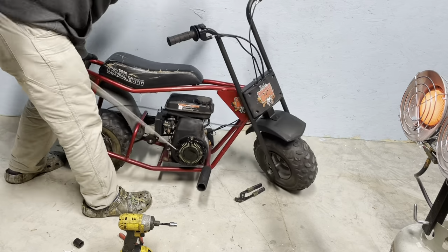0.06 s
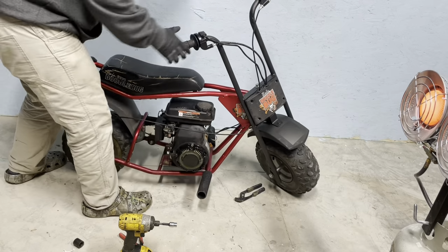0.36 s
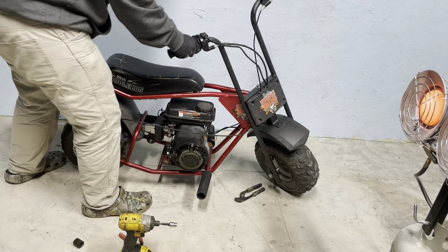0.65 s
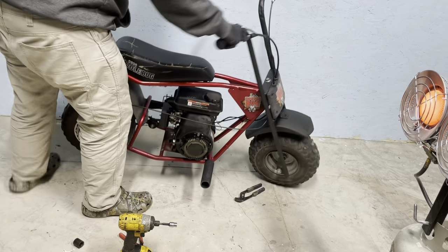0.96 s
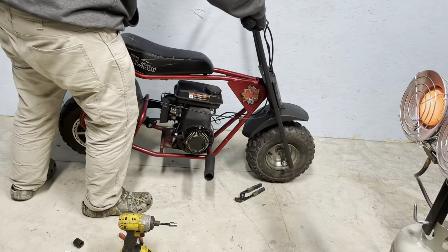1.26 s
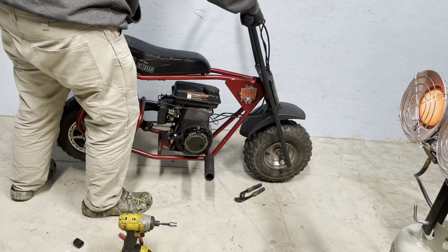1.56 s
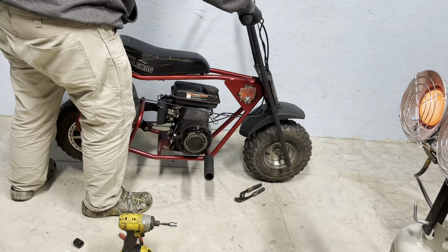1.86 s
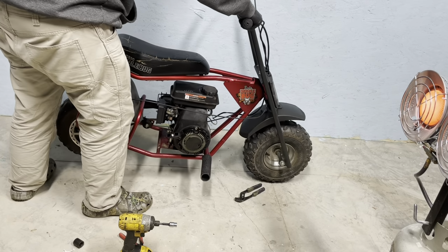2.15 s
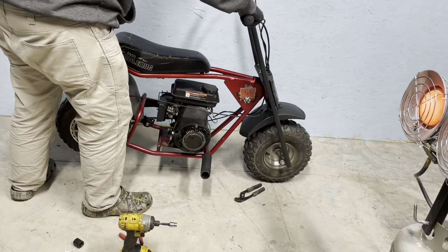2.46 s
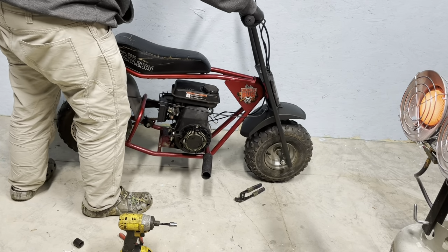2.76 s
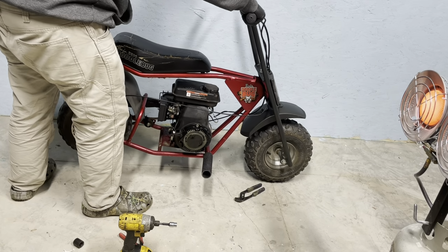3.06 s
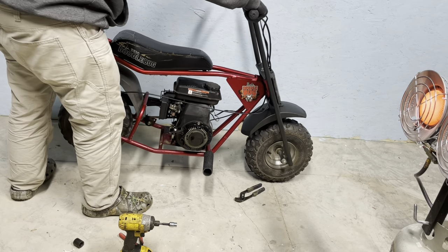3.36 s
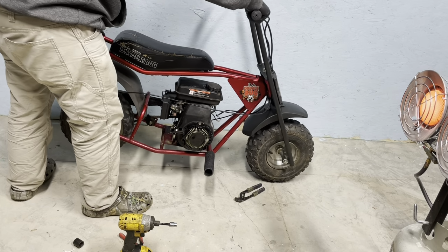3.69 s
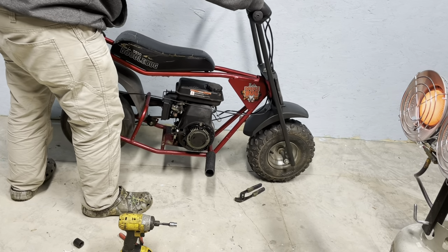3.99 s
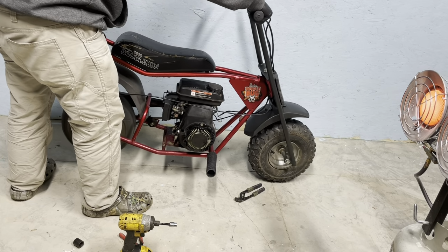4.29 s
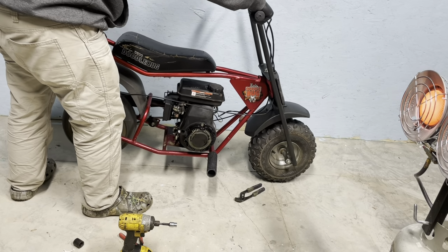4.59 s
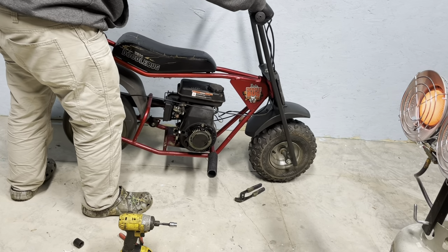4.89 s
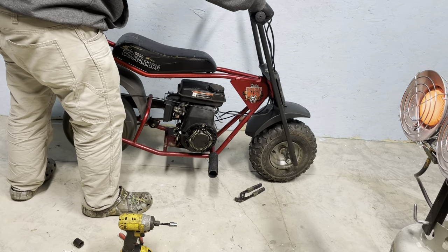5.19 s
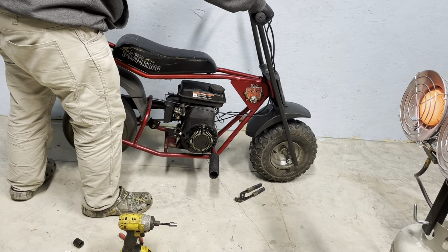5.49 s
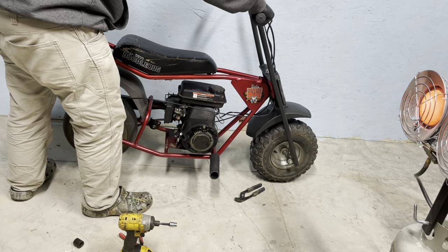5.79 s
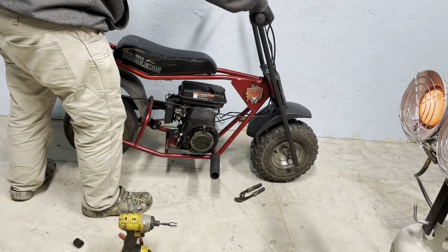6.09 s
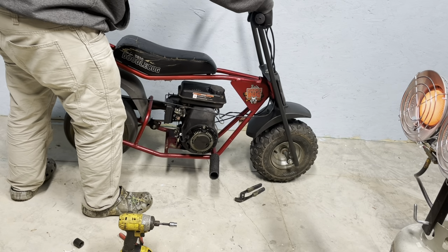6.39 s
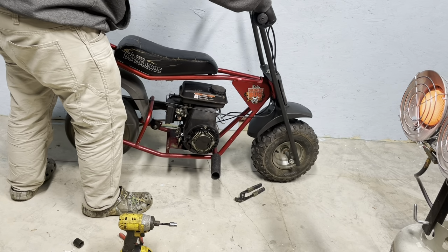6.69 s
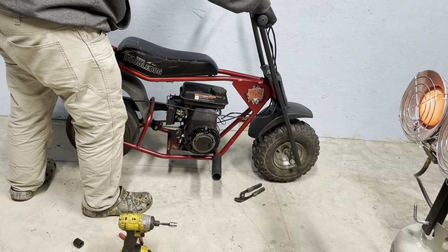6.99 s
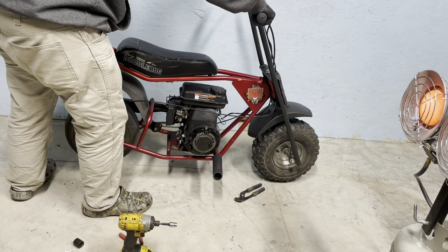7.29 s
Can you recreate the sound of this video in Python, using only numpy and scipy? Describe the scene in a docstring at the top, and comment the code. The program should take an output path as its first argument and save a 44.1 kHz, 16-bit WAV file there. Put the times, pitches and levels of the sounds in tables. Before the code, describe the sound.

Heard close up in stereo in a bare garage, a small minibike engine has just been pull-started, its handle bouncing back with a tinny clack. The engine chugs with low, even thumps, then stumbles and pops as it gathers speed. A gentle rev brings a higher, hissing, rattling run with light metal knocks, before the engine slows with muffled thuds and fires again.

```python
"""A bare-walled garage, a stereo microphone pair close to a minibike that has just been pull-started.
The handle clacks home on the tin shroud. The single-cylinder four-stroke idles, fires only every other
cycle for a while, is revved gently, coasts down with dull thuds and catches again. Exhaust thumps echo
off the walls, burnt gas hisses from the outlet, and four piston reversals a cycle rattle the casing."""
import sys
import numpy as np
from scipy import signal
from scipy.fft import rfft, irfft, next_fast_len
from scipy.io import wavfile
from scipy.ndimage import uniform_filter1d

SR = 44100
rng = np.random.default_rng(int(sys.argv[2]) if len(sys.argv) > 2 else 0)


def dump(signal):
    """Clip the signal to [-1, 1] and save it as 16-bit WAV at the path in sys.argv[1]."""
    limited = np.clip(np.atleast_2d(signal).T, -1, 1)
    pcm = np.round(limited * 32767).astype(np.int16)
    wavfile.write(sys.argv[1], SR, pcm)


N = 332921
T = np.arange(N) / SR
FFT_SIZE = next_fast_len(N + SR)
HZ = np.maximum(np.arange(FFT_SIZE // 2 + 1) * SR / FFT_SIZE, 1)

# Levels are relative within each table. One engine cycle is two crank turns.
# engine speed: t/s, speed/(cycles/s)
ENGINE_SPEED = [(0.0, 12.383), (0.31, 11.84), (0.95, 12.971), (1.81, 13.665), (2.01, 14.738),
                (2.53, 14.959), (3.0, 16.009), (3.45, 17.385), (3.55, 19.11), (4.15, 19.707), (4.3, 22.094),
                (4.79, 24.056), (5.41, 28.652), (6.1, 31.342), (6.68, 25.365), (6.92, 23.85), (7.02, 22.55),
                (7.09, 21.95), (7.2, 22.05), (7.32, 21.5), (7.55, 23.055)]
# how hard the engine works: t/s, level/dB
ENGINE_EFFORT = [(0, 8), (.1, -9), (.26, -18.5), (.52, -0.5), (1.1, 1.5), (1.85, 0), (2.4, 0.7), (2.6, 0),
                 (3.45, -0.5), (3.58, -1), (4.35, 1.5), (5.3, -2), (6.1, -5.5), (6.25, -7), (6.42, -10.5),
                 (7.32, -7.5), (7.43, -3), (7.52, 1.5)]
# strength of the strokes: t/s, exhaust level/dB, intake level/dB
STROKE_LEVELS = [(0, -12, -37), (.1, -22, -38), (.24, -36, -50), (.5, -18, -33), (1.1, -15.5, -31),
                 (1.85, -17.5, -23), (2.05, -13, -25), (2.45, -15, -23), (2.6, -19.5, -22),
                 (3.45, -19, -26), (3.62, -15, -41), (3.85, -19, -42), (4.2, -15.5, -38), (4.4, -13, -27),
                 (4.6, -21, -27), (4.75, -14.5, -25), (5.1, -12.5, -31), (5.5, -18, -26.5),
                 (6.0, -19.5, -28), (6.25, -27, -29), (7.3, -23, -44), (7.42, -18, -29)]
# cycles that fail to fire: t/s
MISFIRES = [2.55, 2.68, 2.81, 2.94, 3.06, 3.18, 3.3, 3.42]
# sharp pops, mostly after a missed cycle: t/s, level/dB
EXHAUST_POPS = [(2.412, -35), (2.6147, -27.5), (2.744, -25.5), (2.872, -26.5), (2.997, -25.5),
                (3.119, -26.5), (3.2414, -24.5), (3.359, -23.5), (3.4754, -21.5), (3.528, -17.5),
                (3.5834, -22), (3.6342, -15.5), (3.735, -14.5), (3.842, -14.5), (3.9435, -13), (3.998, -30),
                (4.0477, -12.5), (4.097, -15), (6.054, -31), (6.085, -24)]
# dull thuds in the muffler while coasting: t/s, level/dB
COASTING_THUDS = [(6.0993, -20), (6.166, -33), (6.224, -23), (6.377, -18), (6.42, -23), (6.51, -20),
                  (6.545, -20), (6.639, -20), (6.731, -19)]
# muffler resonances: f/Hz, width/Hz, level/dB
MUFFLER_MODES = [(99, 46, 6.5), (156, 60, -17.5)]
# air box resonances: f/Hz, width/Hz, level/dB
AIRBOX_MODES = [(99, 63, -3), (132, 50, 4), (200, 70, 2.5)]
# the direct thump and its wall echoes, which make the double chug: delay/s, level/dB
WALL_ECHOES = [(0, 0), (.014, .8), (.0197, -7), (.0439, -6.5)]
# deep bass booming in the garage: t/s, level/dB
BOOM_LEVEL = [(0.0, -22), (0.17, -49), (0.21, -71), (0.44, -43), (1.16, -33), (2.12, -39), (2.61, -35),
              (4.0, -37), (4.86, -21), (4.98, -25), (5.95, -35), (6.29, -56), (6.73, -39), (7.04, -63),
              (7.55, -29)]
# stretches in which every cycle fires with a hiss: start/s, end/s, level/dB
FIRING_SPANS = [(.38, 1.4, -53.5), (1.4, 1.93, -54), (1.93, 2.46, -45.5), (4.13, 6.1, -31),
                (7.36, 7.59, -31)]
# spectrum of the gas jet: f/Hz, level/dB
PUFF_SPECTRUM = [(400, 12), (1000, 7.5), (3000, 6.5), (5000, 0), (7300, 7.5), (8600, 12.5), (10500, 9),
                 (13500, 10), (16000, 0)]
# whistles of the muffler outlet: f/Hz, width/Hz, lift/dB
OUTLET_WHISTLES = [(3090, 130, 5), (5360, 180, 7), (6500, 180, 4), (7000, 230, 7), (10700, 200, 3),
                   (12500, 300, 4), (13650, 500, 3)]
# spectrum of the casing's low drone: f/Hz, level/dB
DRONE_SPECTRUM = [(120, 0), (220, -1.5), (320, -2.5), (440, -0.5), (540, -4), (700, -8.5), (1400, -29.5)]
# spectrum of the intake's bark: f/Hz, level/dB
BARK_SPECTRUM = [(350, -40), (500, -1), (600, 6.5), (690, 6.5), (780, -1), (900, -4.5), (1500, -31)]
# spectrum of rattling metal: f/Hz, level/dB
RATTLE_SPECTRUM = [(400, -10), (800, -3), (1100, -1), (1800, 5), (3000, 1.5), (4800, -4), (5700, -4),
                   (7500, -8), (10000, -25), (16000, -45)]
# spectrum of the clutch's hiss: f/Hz, level/dB
CLUTCH_SPECTRUM = [(1500, -14), (3000, 3), (4500, 8), (5700, -1), (7300, 0), (8500, 9), (10000, 1.5),
                   (12000, -2), (13700, 3), (16000, -7)]
# casing resonances: f/Hz, width/Hz, lift/dB
CASING_MODES = [(425, 50, 5.5), (568, 63, 2.5), (611, 50, 1), (668, 55, 3), (996, 160, 7), (1212, 180, 5.5),
                (1620, 110, 4.5), (2220, 70, 1.5), (2740, 150, 3.5), (3100, 120, 2.5), (4110, 67, 1),
                (4800, 150, 2.5)]
# starter handle hitting the shroud: t/s, crack level/dB, ring level/dB
HANDLE_HITS = [(0.0302, -6.5, -12), (0.039, -10, -15), (.092, -11, -24), (0.1034, -5, 4.5),
               (0.114, -8.5, -21), (0.139, -4.5, 1), (0.147, -5.5, 3.5), (0.16, -7, 1), (0.169, -10, -9)]
# spectrum of the handle's crack: f/Hz, level/dB
CRACK_SPECTRUM = [(350, -8.5), (600, 2), (800, -18), (1000, 6), (1250, -4.5), (1700, 5), (2900, -1),
                  (3900, 1), (6000, -3.5), (8500, 5.5), (11000, 1), (16000, -6.5)]
# modes of the tin shroud: f/Hz, level/dB, t60/s
SHROUD_MODES = [(1030, 6, .16), (1850, -4, .35), (2040, 0, .2), (2375, 8, .08), (2660, 9, .08),
                (2950, 11, .1), (3375, 1, .2), (3760, -2, .3), (6800, -5, .25), (8070, -3, .16),
                (8700, 0, .15), (10100, -2, .2), (10800, -5, .15), (12900, -4, .15)]
# loose metal knocking during the rev: t/s, level/dB
METAL_KNOCKS = [(4.56, -20), (4.6435, -21.5), (4.745, -21), (4.8135, -27), (4.9745, -32), (5.0112, -24),
                (5.1674, -26), (5.2084, -23), (5.239, -24.5), (5.3091, -27), (5.5247, -20.5)]
# cooling fins and heat shield: f/Hz, width/Hz, level/dB, jolt angle/cycles
FIN_MODES = [(983, 84, -38.5, 0.615), (1010, 65, -38, 0.85), (1615, 100, -49.5, 0.032),
             (3140, 380, -43, 0.018), (1704, 60, -49, 0.3), (3150, 200, -46, 0.53), (5210, 90, -44, 0.015),
             (5260, 72, -53, 0.24), (5340, 110, -53, 0.58), (6470, 180, -44, 0.015),
             (6750, 120, -49.5, 0.42), (7180, 100, -44.5, 0.016), (7170, 130, -47, 0.36),
             (7870, 440, -42.5, 0.0096)]
# casing hoot, slipping clutch's sizzle, a growl and two tinny rings, each near one engine speed:
# speed/(cycles/s), reach/(cycles/s), f/Hz, width/Hz, level/dB
SINGING_PARTS = [(22.7, 1.0, 415, 40, -37), (19.58, .22, 13400, 1800, -28.5), (29.5, 2.2, 640, 150, -35),
                 (24, 3, 2750, 150, -43.5), (24, 3, 4600, 250, -43.5)]
# casing resonances that the gear whine meets: f/Hz, width/Hz, level/dB
HOOT_MODES = [(404, 7, -31), (430, 8, -38)]
# the microphone pair: f/Hz, left-right likeness, left lead/rad, left over right/dB
MIC_PAIR = [(60, .99, 0, 1), (160, .96, 0, 1.5), (330, .75, .1, .7), (680, .3, .3, .8), (1000, .5, .3, 2),
            (1450, .48, 0, 2), (3100, .62, 1.3, 2), (5200, .42, 1.1, 2.4), (5800, .42, -1.7, 2),
            (6800, .48, -1.4, 1), (7600, .85, -2.7, 0), (8600, .96, -3.15, 0), (11000, .78, -4.7, 0),
            (13200, .98, -6.28, 0), (16000, .98, -6.28, 0)]

IDLE_SPEED, MID_SPEED, BARK_OPENS_SPEED, CLUTCH_BITE_SPEED = 12.8, 20, 20.7, 18.24  # cycles/s
THUMP_LAG_S, SUCK_LAG_S = .0084, .006
DRONE_BAND, BARK_BAND, RATTLE_BAND, HISS_BAND = (330, 520), (540, 760), (1200, 5000), (9500, 16000)  # Hz
GARAGE_T60_S, LOW_CUT_HZ, HIGH_CUT_HZ = 0.38, 52, 16000


def putter(cycles, pop_lift_db=4, suck_db=2):
    """A fired cycle pushes gas through the muffler, a missed one sucks it back; the air box gulps."""
    exhaust_db, intake_db = in_time(STROKE_LEVELS)
    exhaust_db += pop_lift_db * near(np.transpose(EXHAUST_POPS)[0])
    strokes = from_db(exhaust_db) * each_cycle(cycles, 0, jitter_s=.0001, spread_db=0.6)
    missed = near(MISFIRES)
    pushes = later(strokes * (1 - missed), THUMP_LAG_S)
    sucks = from_db(suck_db) * later(strokes * missed, SUCK_LAG_S)
    thuds = later(listed_clicks(COASTING_THUDS), THUMP_LAG_S)
    gas = swell(pushes - sucks + thuds, peak_s=0.0019, order=3)
    gulps = from_db(intake_db) * each_cycle(cycles, .21, jitter_s=.0001, spread_db=2.2)
    air = -swell(later(gulps, THUMP_LAG_S), peak_s=0.0041, order=3)
    muffler = sum(from_db(db) * resonate(gas, hz, width) for hz, width, db in MUFFLER_MODES)
    airbox = sum(from_db(db) * resonate(air, hz, width) for hz, width, db in AIRBOX_MODES)
    return muffler + airbox


def exhaust_puffs(cycles, speed, effort_db):
    """Burnt gas jets through the outlet for a few ms, in steady firing and at each pop."""
    firing = sum(from_db(db + 8 + 0.51 * effort_db) * (T > start) * (T < end)
                 for start, end, db in FIRING_SPANS)
    firing *= (IDLE_SPEED / speed) ** 0.67  # crowded puffs each carry less of the level
    regular = firing * each_cycle(cycles + .0078 * speed, .06, jitter_s=0.00018, spread_db=2.2)
    pops = from_db(-6) * listed_clicks(EXHAUST_POPS)
    jet = swell(regular, peak_s=0.0083, order=4) + swell(pops, peak_s=0.0034)
    # squared, so only hard pops shake the heat shield into a sizzle
    sizzle = from_db(9) * swell(pops ** 2, peak_s=0.017, order=1)
    return colour(np.hypot(jet, sizzle) * noise(), PUFF_SPECTRUM, OUTLET_WHISTLES, HISS_BAND)


def clatter(cycles, speed, effort_db):
    """The piston slaps, the valves tick shut, the intake barks; the starter rope whirrs onto its reel."""
    slaps = sum(each_cycle(cycles, reversal / 4 + 0.1022, jitter_s=0.00046, spread_db=3.2)
                for reversal in range(4))
    ticks = sum(each_cycle(cycles, angle, jitter_s=.0003, spread_db=2.5) for angle in (.3, .51))
    chuffs = each_cycle(cycles, .13, jitter_s=.0005, spread_db=1.5)
    # each envelope is a steady floor with bumps on it
    drone = evened(from_db(4) + swell(slaps, peak_s=0.00024) + from_db(-16) * swell(chuffs, peak_s=.008))
    drone *= engine_gain(speed, -35 + 0.6 * effort_db, per_doubling_db=7.6)
    bark = evened(from_db(5) + swell(slaps, peak_s=.0015) + from_db(-2) * swell(ticks, peak_s=0.0028))
    bark *= engine_gain(speed, -39 + 0.89 * effort_db, per_doubling_db=9.9)
    bark *= from_db(8 * past(speed, BARK_OPENS_SPEED, width=1.3))
    rattle = evened(from_db(6) + swell(slaps, peak_s=0.00057) + from_db(16) * swell(ticks, peak_s=93e-6))
    rattle *= engine_gain(speed, -30.5 + effort_db, per_doubling_db=16.45)
    rope = from_db(-32.5 - 71 * np.maximum(T - 0.49, 0))  # home at 0.49 s, then fading 71 dB/s
    return (colour(drone * noise(), DRONE_SPECTRUM, CASING_MODES, DRONE_BAND)
            + colour(bark * noise(), BARK_SPECTRUM, CASING_MODES, BARK_BAND)
            + colour(np.hypot(rattle, rope) * noise(), RATTLE_SPECTRUM, CASING_MODES, RATTLE_BAND))


def starter_handle():
    """The handle bounces on the tin shroud: a crunchy crack each time, and the shroud rings on."""
    times, crack_db, ring_db = np.transpose(HANDLE_HITS)
    bursts = swell(clicks(times, from_db(crack_db)), peak_s=0.0029, order=1) * noise()
    cracks = colour(bursts, CRACK_SPECTRUM, [(2870, 630, 5.1)], HISS_BAND)
    t = T[:SR]
    shroud = sum(from_db(db - 60 * t / t60) * np.sin(2 * np.pi * (hz * t + rng.random((2, 1))))
                 for hz, db, t60 in SHROUD_MODES)
    ringing = signal.fftconvolve(clicks(times, from_db(ring_db))[None], shroud, axes=1)[:, :N]
    return from_db(-14) * cracks + from_db(-36.5) * ringing


def clutch(speed, effort_db):
    """The clutch hisses once it bites; at lower speeds it runs free, almost silent."""
    free = 1 - past(speed, CLUTCH_BITE_SPEED, width=0.77)
    gain = engine_gain(speed, -32 + 0.84 * effort_db - 50 * free, per_doubling_db=6.9)
    return colour(gain * noise(), CLUTCH_SPECTRUM, [], HISS_BAND)


def loose_metal():
    """Loose metal strikes the casing, a short crash each time."""
    crashes = swell(listed_clicks(METAL_KNOCKS), peak_s=0.0043, order=1) * noise()
    return colour(crashes, RATTLE_SPECTRUM, CASING_MODES, RATTLE_BAND)


def fins(cycles):
    """Thin metal on the cylinder is jolted every cycle and rings on; a pop makes its high modes clink."""
    times, pop_db = np.transpose(EXHAUST_POPS)
    pops = clicks(times, from_db(np.minimum(pop_db + 43, 4)))
    ringing = 0
    for hz, width, db, angle in FIN_MODES:
        jolts = each_cycle(cycles, angle, jitter_s=.0005, spread_db=2.5) + pops * (hz > 2000)
        ring = resonate(swell(jolts, peak_s=0.0058, order=1) * noise(), hz, width)
        ringing += from_db(db - 6) * ring / ring.std()
    return ringing


def singing_parts(speed):
    """Each part swells in sympathy as the engine passes its speed."""
    song = 0
    for centre, reach, hz, width, db in SINGING_PARTS:
        ring = evened(resonate(resonate(noise(), hz, width), hz, width))
        song += from_db(db) * np.exp(-((speed - centre) / reach) ** 2) * ring
    return song


def gear_hoot(cycles, speed, teeth_per_cycle=18):
    """The gear whine glides with the engine, wavering, and swells on the casing's resonances."""
    mesh_hz = teeth_per_cycle * speed
    gain = sum(from_db(db) * np.exp(-((mesh_hz - hz) / width) ** 2) for hz, width, db in HOOT_MODES)
    waver = signal.sosfilt(signal.butter(2, 12, fs=SR, output="sos"), noise())
    return from_db(3.5) * gain * np.sin(2 * np.pi * teeth_per_cycle * cycles + 0.71 * waver / waver.std())


def garage_chug(thumps):
    """Thumps come back off the nearby walls; a room mode hums on and the deep bass booms."""
    echoed = sum(from_db(db) * later(thumps, delay) for delay, db in WALL_ECHOES)
    hum = from_db(-8) * resonate(echoed, hz=91, width_hz=12)
    boom = signal.sosfilt(signal.butter(2, [45, 66], "band", fs=SR, output="sos"), echoed)
    return from_db(-0.5) * (echoed + hum) + from_db(in_time(BOOM_LEVEL)[0] - 8) * evened(boom)


def garage_tail(fields, wet_db, build_up_s=0.0039):
    """Bare walls add a smooth tail to each sound field."""
    t = T[:SR]
    tails = rng.standard_normal((2, SR)) * from_db(-60 * t / GARAGE_T60_S) * (1 - np.exp(-t / build_up_s))
    tails *= from_db(wet_db) / np.linalg.norm(tails, axis=1, keepdims=True)
    return (fields + signal.fftconvolve(fields, tails, axes=1)[:, :N]) / np.hypot(1, from_db(wet_db))


def microphones(fields):
    """The pair shares the direct field, takes the scattered one with opposite signs and cuts deep bass."""
    alike, lead, balance_db = at_hz(MIC_PAIR)
    direct, scattered = rfft(fields, FFT_SIZE)
    side = np.array([[1], [-1]])
    pair = np.sqrt((1 + alike) / 2) * direct + side * np.sqrt((1 - alike) / 2) * scattered
    pair /= np.sqrt(1 + (LOW_CUT_HZ / HZ) ** 10)
    pair *= np.exp(.5j * side * lead) * from_db(side * balance_db / 2)
    return irfft(pair, FFT_SIZE)[:, :N]


def from_db(db):
    """Decibels to gain."""
    return 10 ** (np.asarray(db) / 20)


def engine_gain(speed, mid_speed_db, per_doubling_db):
    """Gain of a part that grows louder with engine speed."""
    return from_db(mid_speed_db + per_doubling_db * np.log2(speed / MID_SPEED))


def past(speed, knee, width):
    """Rises smoothly from 0 to 1 as the speed passes the knee."""
    return (1 + np.tanh((speed - knee) / width)) / 2


def near(times):
    """1 within 22 ms of the given moments, else 0."""
    return 1.0 * (sum(abs(T - s) < .022 for s in times) > 0)


def later(x, delay_s):
    """Delay a signal."""
    return np.interp(T - delay_s, T, x, left=0)


def in_time(rows):
    """Each column of a curve at every sample."""
    times, *columns = np.transpose(rows)
    return [np.interp(T, times, column) for column in columns]


def at_hz(rows):
    """Each column of a spectrum at every frequency."""
    hz, *columns = np.transpose(rows)
    return [np.interp(np.log(HZ), np.log(hz), column) for column in columns]


def noise():
    """Unrelated white noise for the direct and the scattered sound field."""
    return rng.standard_normal((2, N))


def colour(x, spectrum, resonances, band):
    """Shape x by a spectrum with resonant humps; unit white noise comes out with rms 1 within the band."""
    humps_db = sum(lift / (1 + (2 * (HZ - hz) / width) ** 2) for hz, width, lift in resonances)
    gain = from_db(at_hz(spectrum)[0] + humps_db)
    gain /= np.sqrt(np.mean(gain ** 2 * (HZ > band[0]) * (HZ < band[1])))
    return irfft(rfft(x, FFT_SIZE) * gain, FFT_SIZE)[..., :N]


def resonate(x, hz, width_hz):
    """Two-pole resonance, gain 1 on top."""
    r = np.exp(-np.pi * width_hz / SR)
    feedback = [1, -2 * r * np.cos(2 * np.pi * hz / SR), r * r]
    return signal.lfilter(np.array([1, 0, -1]) * (1 - r * r) / 2, feedback, x + 1e-18)


def evened(x):
    """Hold the rms at 1 over a few engine cycles."""
    size = int(.15 * SR)
    return x / np.sqrt(uniform_filter1d(uniform_filter1d(x * x, size), size) + 1e-20)


def clicks(times, sizes):
    """A train of clicks."""
    return np.bincount(np.clip(np.asarray(times) * SR, 0, N).astype(int), sizes, N + 1)[:N]


def listed_clicks(rows):
    """Clicks from rows of t/s, level/dB."""
    times, db = np.transpose(rows)
    return clicks(times, from_db(db))


def each_cycle(cycles, angle, jitter_s, spread_db):
    """One click a cycle at the given share of the cycle, a little uneven in time and strength."""
    marks = np.arange(200) + angle
    timing, strength = rng.standard_normal((len(marks), 2)).T
    times = np.interp(marks, cycles, T, right=2 * T[-1])
    return clicks(times + jitter_s * timing, from_db(spread_db * strength))


def swell(train, peak_s, order=2):
    """Every click becomes a bump of its own height, peaking after peak_s; higher orders are tighter."""
    u = T[:SR // 5] / peak_s
    return signal.fftconvolve(train, (u * np.exp(1 - u)) ** order)[:N]


def scene():
    """The minibike and the garage at the microphones; the crank angle times the engine's strokes."""
    speed, effort_db = in_time(ENGINE_SPEED)[0], in_time(ENGINE_EFFORT)[0]
    cycles = .04 + np.cumsum(speed) / SR
    machinery = clatter(cycles, speed, effort_db) + clutch(speed, effort_db) + fins(cycles)
    machinery += singing_parts(speed) + loose_metal() + gear_hoot(cycles, speed)
    fields = from_db(-0.5) * garage_tail(machinery, wet_db=-8.5)
    fields += from_db(4) * garage_tail(exhaust_puffs(cycles, speed, effort_db), wet_db=-3)
    fields += from_db(2.5) * garage_tail(starter_handle(), wet_db=-3.5)
    fields[0] += garage_chug(putter(cycles))  # direct field only
    return microphones(fields)


def record(dry):
    """A steep low-pass cuts the top treble."""
    return signal.sosfilt(signal.ellip(12, .1, 90, HIGH_CUT_HZ, fs=SR, output="sos"), dry)


dry = scene()
out = record(dry)
dump(out)
```